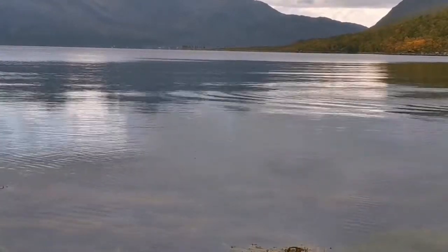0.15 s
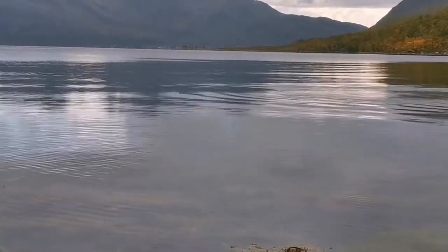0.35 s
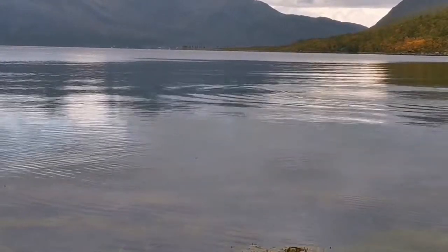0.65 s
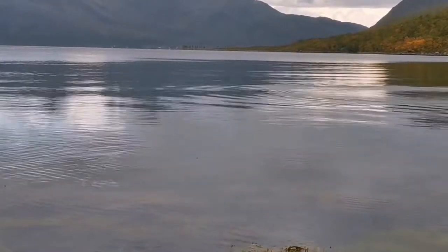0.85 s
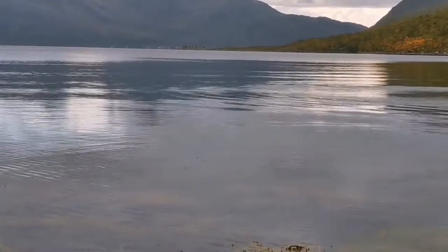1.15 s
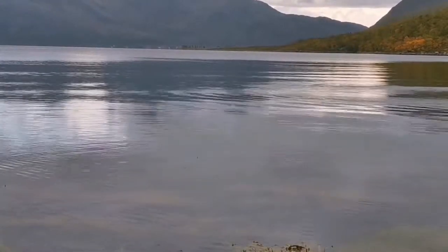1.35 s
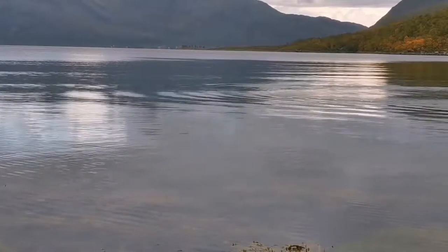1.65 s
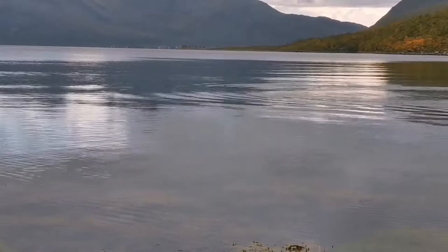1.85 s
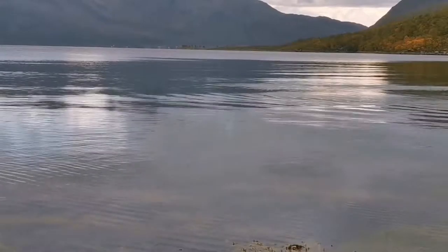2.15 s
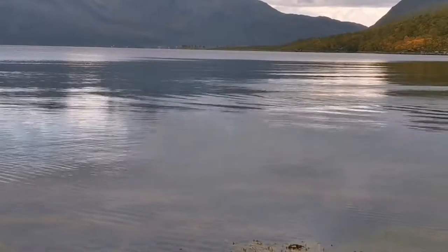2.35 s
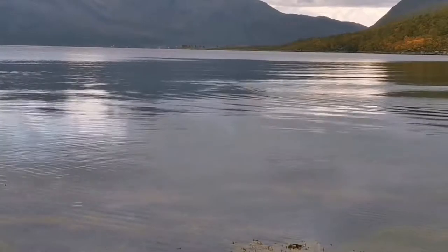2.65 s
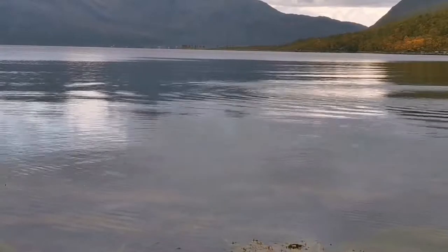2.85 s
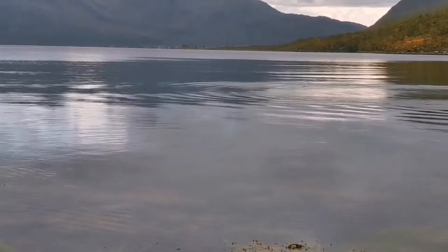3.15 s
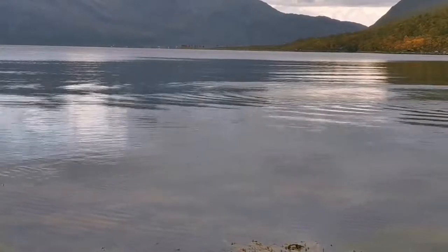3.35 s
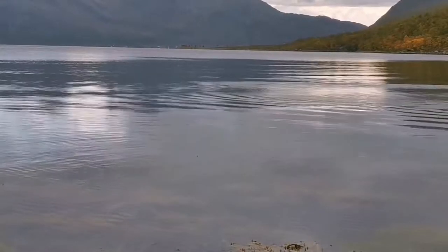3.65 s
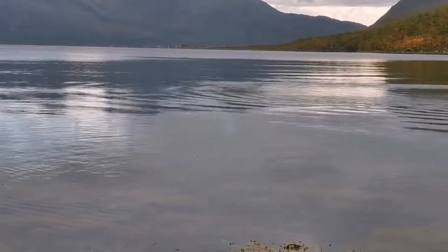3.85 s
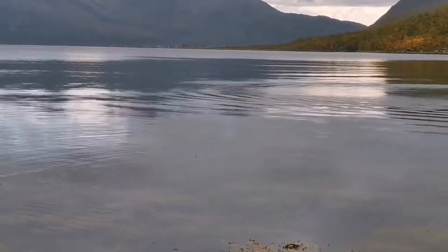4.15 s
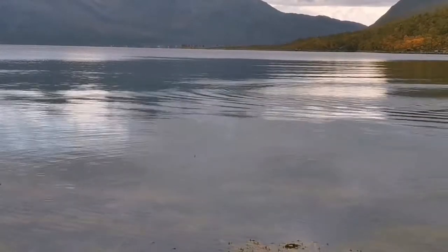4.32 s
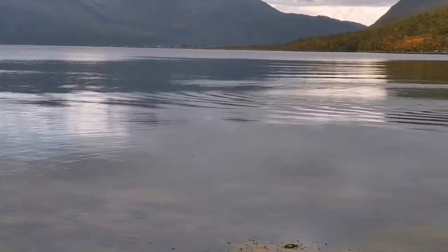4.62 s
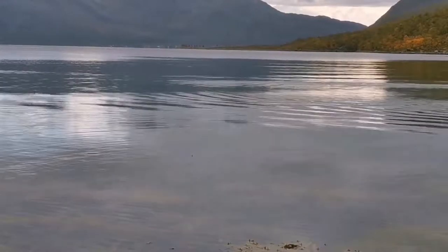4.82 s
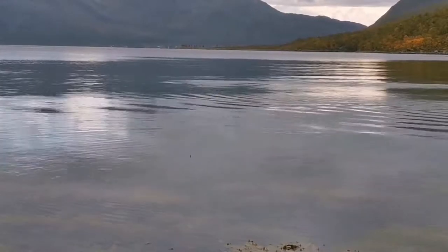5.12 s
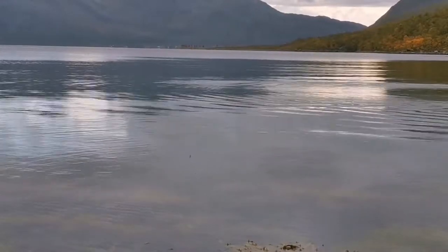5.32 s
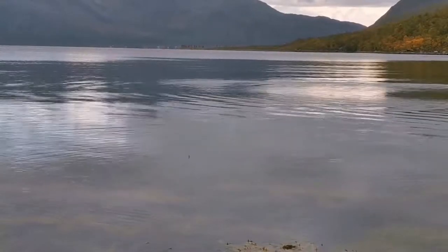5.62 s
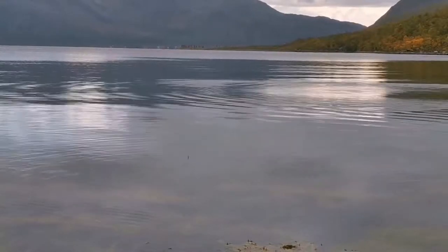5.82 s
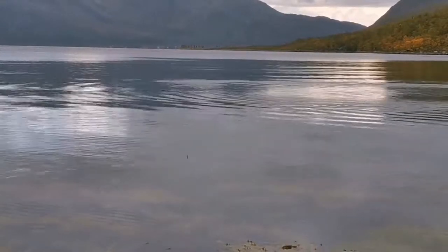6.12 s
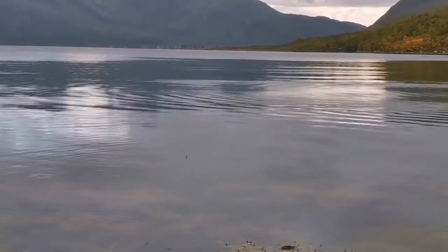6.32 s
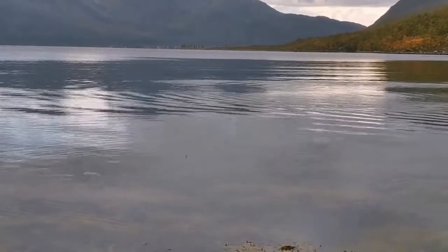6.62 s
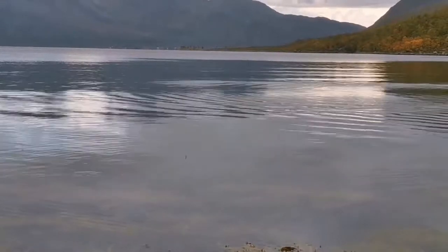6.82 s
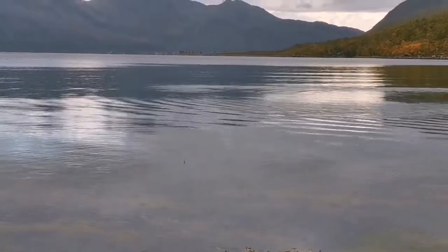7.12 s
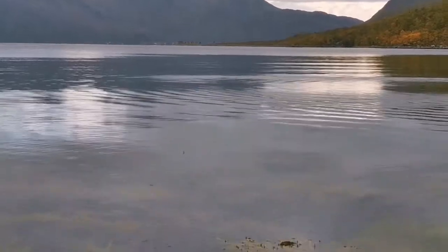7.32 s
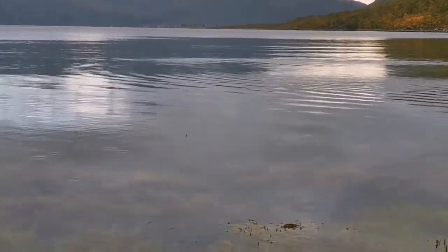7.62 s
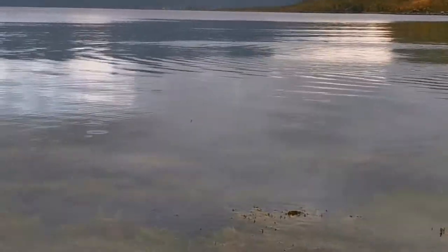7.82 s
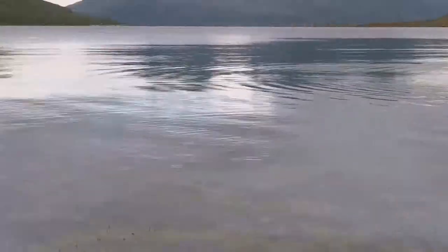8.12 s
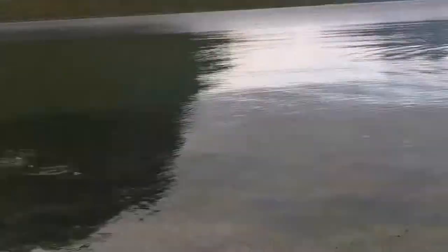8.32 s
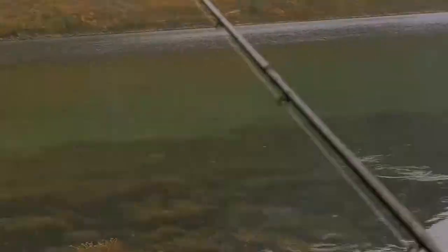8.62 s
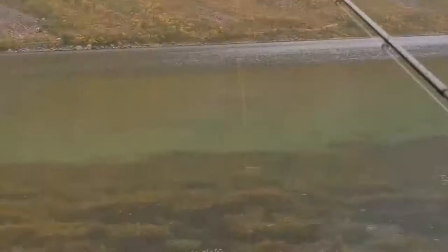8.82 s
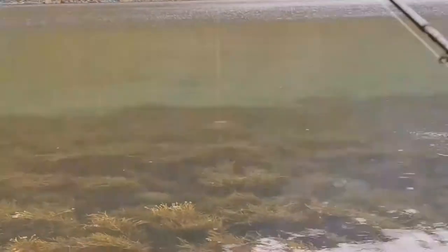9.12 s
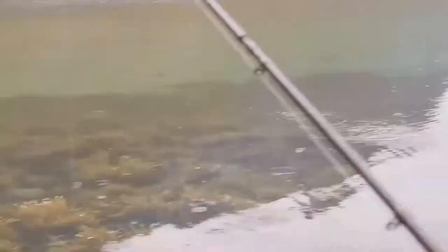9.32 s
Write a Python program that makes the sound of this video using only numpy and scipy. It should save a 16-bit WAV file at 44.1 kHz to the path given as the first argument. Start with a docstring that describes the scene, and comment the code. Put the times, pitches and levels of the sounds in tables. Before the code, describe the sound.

A calm shore, very quiet: low far-off water murmur, faint sleeve rustle near the right microphone, and tiny wet ticks, several around 1.3-2.2 s. To the right, an otter calls. Thin, piercing whistles around 5.5 kHz, each about a third of a second, start at 1.0, 2.4, 3.7 and a softer one at 4.9 s; each scoops up, turns slightly husky, then droops. Shorter, lower, reedy yelps near 1.5 kHz come at 1.35, 2.9 (strongest), 4.4, 5.4 and 6.5 s, with a weak, short echo. A brief cloth swish brushes by at 3.0 s. At 7.5 and 7.75 s there are small zip or clasp ticks on the right. From 8 s to the end at about 9.4 s, handling dominates: ragged cloth strokes and blunt finger knocks on the left, heaviest near 8.0-8.4 and 8.7 s, with lighter, hissier sliding on the right. A faint last whistle at 9.0 s is nearly masked.

```python
"""Otter calling on a calm rocky shore

Off to the right an otter gives long thin whistles (gliding tones that break into a husk) and low yelps
(harmonics on an arched pitch), with a weak echo. Behind it: far water and sleeve swishes, both coloured
noise, and small water ticks. Near the end the hand-held camera is handled: banded noise for cloth rubbing
its two microphone ports, damped sines with cracks for two zip or clasp ticks and then finger bumps."""
import sys
import numpy as np
from scipy import signal
from scipy.fft import rfft, irfft
from scipy.io import wavfile

SR = 44100
rng = np.random.default_rng(int(sys.argv[2]) if len(sys.argv) > 2 else 0)


def master_out(mix):
    """Clip the mix to full scale and print it as 16-bit PCM to the path in sys.argv[1]."""
    frames = np.transpose(np.atleast_2d(mix))
    ceiling = np.clip(frames, -1, 1)
    pcm = np.round(ceiling * 32767).astype(np.int16)
    wavfile.write(sys.argv[1], SR, pcm)


N = 417614
T = np.arange(N) / SR
HZ = np.maximum(np.arange(N // 2 + 1) * SR / N, 1)


def undb(db):
    """Decibels to gain."""
    return 10 ** (np.asarray(db) / 20)


def unit(x):
    """Scale to rms 1."""
    return x / np.sqrt(np.mean(x ** 2) + 1e-20)


def colour(points):
    """Gain at every frequency from (Hz, dB) points, straight over log frequency."""
    hz, db = np.transpose(points)
    return undb(np.interp(np.log(HZ), np.log(hz), db))


def filtered(x, gain):
    """Apply a gain per frequency."""
    return irfft(rfft(x) * gain, N)


def noise(gain):
    """Coloured noise of rms 1."""
    return unit(filtered(rng.standard_normal(N), gain))


def walk(rate_hz):
    """Smooth random signal of rms 1 that changes about rate_hz times a second."""
    return noise(1 / (1 + (HZ / rate_hz) ** 4))


def curves(rows):
    """The columns of a table, joined by straight lines in time."""
    s, *columns = np.transpose(rows)
    return [np.interp(T, s, c) for c in columns]


def gate(t, start, end, fade):
    """1 between start and end, with soft edges."""
    inside = np.minimum(t - start, end - t)
    return np.sin(np.pi / 2 * np.clip(inside / fade + .5, 0, 1)) ** 2


def edge(t, width):
    """A smooth step from 0 to 1 at t = 0."""
    return .5 + .5 * np.tanh(t / (2 * width))


def swell(start, length, attack, release):
    """Attack, hold and release of one movement."""
    return edge(T - start, attack) * edge(start + length - T, release)


def cycle(hz):
    """Phase of a vibration in radians."""
    return 2 * np.pi * np.cumsum(hz) / SR


def place(x, pan_db):
    """Share a sound between the ports, pan being left minus right; the louder one gets it in full."""
    return x * undb(np.minimum([[pan_db], [-pan_db]], 0))


# Far water common to both ports. Each row: frequency in Hz, relative density in dB per Hz.
SHORE_MID = [(15, -31), (25, -10.5), (49, -4.5), (86, -3), (156, 1.5), (349, -11.5), (762, -7), (1450, -16),
             (2300, -19), (2630, -25.5), (3830, -33.5), (6380, -39), (10600, -47), (12200, -46),
             (15500, -43)]
# Far water that differs between the ports. Each row: frequency in Hz, relative density in dB per Hz.
SHORE_SIDE = [(15, -35), (25, -16), (129, -12.5), (227, -11.5), (305, -16), (445, -15), (782, -11),
              (1240, -6.5), (1490, -9), (2360, -18), (3260, -25), (5580, -32.5), (15500, -41)]
# Tilt between the ports. Each row: frequency in Hz, left minus right in dB.
SHORE_BALANCE = [(60, 6), (200, 2), (400, 0.5), (700, -4), (2400, -6), (4400, 0.5), (15000, 3.5)]


def shore(mid_db=-54, side_db=-60.5, swell_db=.5, early_db=-2, grow_s=1.75):
    """Murmur of far water that grows a little at first; its bass reaches both ports nearly alike."""
    mid = undb(mid_db) * noise(colour(SHORE_MID)) * undb(swell_db * walk(2.9))
    side = undb(side_db) * noise(colour(SHORE_SIDE))
    lean = np.sqrt(colour(SHORE_BALANCE))
    growth = undb(early_db * np.exp(-T / grow_s))
    return growth * np.array([filtered(mid + side, lean), filtered(mid - side, 1 / lean)])


# Sleeve spectrum. Each row: frequency in Hz, relative density in dB per Hz.
SLEEVE_COLOUR = [(300, -9), (900, 4), (2300, 0), (3800, -4), (5800, -0.5), (7500, -5.5), (9500, 3),
                 (10700, 5.5), (12000, -2.5), (15500, -17)]
# Sleeve swishes. Each row: start in seconds, length in seconds, level in dB before grain and unevenness.
SWISHES = [(0.0, .15, -69.5), (0.594, 0.47, -68), (1.122, 0.07, -57), (1.99, 0.36, -70),
           (2.45, 0.19, -67.5), (3.002, 0.21, -41.5), (3.237, 0.053, -46), (3.35, .62, -65),
           (4.27, 0.082, -49), (4.363, .14, -59.5), (4.574, .42, -66), (5.028, 0.078, -52),
           (5.54, 0.3, -66), (5.776, 0.23, -63), (6.037, 0.41, -67), (6.58, 0.22, -68.5),
           (7.047, 0.69, -69)]


def sleeve(attack_s=0.027, release_s=0.028, rest_db=-75, grain_db=2.0, uneven_db=2.9, pan_db=-12):
    """Smooth cloth swishes close to the right port and never lies quite still."""
    power = undb(rest_db) ** 2
    for start, length, db in SWISHES:
        power = power + (undb(db) * swell(start, length, attack_s, release_s)) ** 2
    hiss = np.array([noise(colour(SLEEVE_COLOUR)) for _ in range(2)])
    texture = undb(grain_db * walk(160) + uneven_db * walk(8.5))
    return place(hiss * np.sqrt(power) * texture, pan_db)


# Water ticks among the stones. Each row: start in seconds, level in dB before gain and band-pass, pitch in Hz.
DRIPS = [(0.3526, -62, 2650), (1.3376, -52.5, 4500), (1.601, -58, 3700), (1.757, -46.5, 3100),
         (1.862, -53, 2530), (1.919, -57, 2590), (2.158, -55, 2720), (4.1064, -54, 2490),
         (4.9454, -49, 5530), (5.5213, -49, 5240)]


def drips(gain_db=2, t60_s=0.012, ring=1.0, pan_db=-6):
    """Tiny wet ticks: a splash of noise and a brief ring."""
    out, t = np.zeros(N), T[:SR // 20]
    for s, db, hz in DRIPS:
        start = int(s * SR)
        splash = rng.standard_normal(len(t)) + ring * np.sin(2 * np.pi * hz * t)
        out[start:start + len(t)] += undb(db + gain_db - 60 * t / t60_s) * splash
    band = signal.butter(1, [2500, 8000], "band", fs=SR, output="sos")
    return place(signal.sosfilt(band, out), pan_db)


# Edges of the rumble, body, scrape and hiss bands.
RUB_EDGES_HZ = [25, 400, 2500, 6000, 15800]


def rub(rumble, body, hiss, points, scrape_db, hiss_share, grain_db, catch_db):
    """Fibres catch and slip: pressure makes rumble, speed makes hiss; the scrape follows body and hiss."""
    tint, out = colour(points), 0
    slips = undb(catch_db * walk(45))
    scrape = undb(scrape_db) * body ** (1 - hiss_share) * hiss ** hiss_share
    for low, high, size in zip(RUB_EDGES_HZ, RUB_EDGES_HZ[1:], (rumble, body, scrape, hiss)):
        band = 1 / np.sqrt((1 + (low / HZ) ** 10) * (1 + (HZ / high) ** 10))
        fibres = rng.standard_normal(N) * slips * undb(grain_db * walk(810))
        out = out + size * unit(filtered(fibres, tint * band))
    return out


# Rubbing spectrum at the right port. Each row: frequency in Hz, relative density in dB per Hz.
RIGHT_COLOUR = [(25, 8), (150, -4), (400, -3.5), (650, 3), (1000, -5), (2500, 0.5), (3600, -2.5), (5400, 1),
                (6500, -5), (7700, -8), (9500, -2.5), (10700, 1), (13500, -7), (15500, -7.5)]
# Sliding on the right port. Each row: time in seconds, rumble, body and hiss levels in dB.
RIGHT_RUB = [(7.48, -51, -56, -68), (7.56, -52, -52.5, -43.5), (7.78, -45.5, -50, -48),
             (7.97, -60, -47, -44), (8.05, -50, -57, -58), (8.2, -42, -44, -49.5), (8.315, -40, -40, -43),
             (8.345, -45, -43, -38), (8.405, -52, -35.5, -54), (8.425, -45, -45, -50),
             (8.49, -58, -41, -40), (8.58, -51, -46, -39.5), (8.65, -45, -47.5, -51.5),
             (8.83, -46, -46.5, -42), (8.96, -54, -50, -41.5), (9.03, -53, -49, -38),
             (9.11, -53, -48, -42.5), (9.2, -48, -42, -35), (9.36, -51, -50, -44.5),
             (9.46, -52, -48, -44.5)]


def right_cloth():
    """Lighter, unbroken sliding over the right port."""
    contact = edge(T - RIGHT_RUB[0][0], .004)
    rumble, body, hiss = undb(curves(RIGHT_RUB)) * contact
    return rub(rumble, body, hiss, RIGHT_COLOUR, scrape_db=-4.5, hiss_share=0.1, grain_db=1.5, catch_db=1.0)


# Rubbing spectrum at the left port. Each row: frequency in Hz, relative density in dB per Hz.
LEFT_COLOUR = [(25, 4), (100, 3), (200, 1), (380, -1.5), (1000, -2), (2000, -4.5), (3000, -12.5),
               (3800, -15), (4900, -14.5), (6000, -25), (7000, -26.5), (8200, -34.5), (11500, -33),
               (15500, -35.5)]
# Strokes on the left port. Each row: start in seconds, length in seconds, initial body level in dB,
# fade over the stroke in dB (negative grows), rumble and hiss in dB against the body.
STROKES = [(7.55, 0.083, -60.5, 5, 15, 17.5), (7.63, 0.21, -55.5, 4, 6, 11), (7.85, 0.32, -52, 0, -4, 7.5),
           (7.962, 0.043, -42.5, -5.5, 3.5, 9.5), (7.992, 0.037, -24, 0, -2, -1),
           (8.018, 0.15, -21, 10.5, -1, -14.5), (8.173, 0.19, -27, 3, 0.5, -14.5),
           (8.275, .08, -36.5, -0.5, 3.5, -0.5), (8.352, 0.08, -32, 2.5, 0, -12.5),
           (8.448, 0.15, -28.5, 7.5, -2.5, 1.5), (8.601, 0.096, -36, -2, -3, -19),
           (8.7, 0.11, -37.5, 5, 6.5, -28), (8.793, 0.13, -30.5, -2, -5.5, -13),
           (8.931, .13, -34, 1.5, -3.5, -15.5), (9.074, 0.074, -31.5, 6.5, -5, -16),
           (9.138, 0.038, -31, -3.5, -1.5, -22), (9.19, 0.13, -52, -8.5, 4, -8),
           (9.31, 0.29, -54.5, -5, 9, -11)]


def left_cloth(attack_s=0.0055, release_s=0.01):
    """Stroke after stroke catches on the left port, fades or grows, and lets go."""
    power = np.zeros((3, N))
    for start, length, db, fade_db, rumble_db, hiss_db in STROKES:
        progress = np.clip((T - start) / length, 0, 1)
        size = swell(start, length, attack_s, release_s) * undb(db - fade_db * progress)
        power += (undb([[rumble_db], [0], [hiss_db]]) * size) ** 2
    rumble, body, hiss = np.sqrt(power)
    return rub(rumble, body, hiss, LEFT_COLOUR, scrape_db=2.5, hiss_share=0.46, grain_db=0.5, catch_db=1.14)


# Zip or clasp ticks (the first two rows) and finger bumps on the case. Each row: start in seconds,
# swing level in dB before onset and decay, pitch in Hz, ring t60 in seconds,
# initial crack rms as a share of the swing level, left minus right in dB.
CONTACTS = [(7.503, -38, 4480, 0.0058, 0.35, -13), (7.7522, -24, 5570, .004, 0.45, -16),
            (7.987, -22.5, 130, 0.041, .02, -21), (8.031, -5.5, 195, 0.012, 0.059, 30),
            (8.108, -3, 620, 0.0063, 0.15, 47), (8.309, -9, 183, 0.017, 0.046, 14),
            (8.349, -1.5, 363, 0.0078, .04, 22), (8.357, -16, 90, 0.023, .1, 12),
            (8.3618, -20.5, 1960, 0.0028, 1.8, 4), (8.4011, -18, 1110, 0.0098, 1.2, 12),
            (8.622, -17, 296, 0.028, .05, 22), (8.714, -7.5, 265, 0.017, .02, 25),
            (8.7206, -4, 252, 0.014, .02, 25), (8.7255, 2, 289, 0.0085, 0.019, 16),
            (8.7304, -11.5, 234, 0.043, .04, 14), (8.809, -18, 220, 0.041, .05, 24),
            (8.834, -12, 205, 0.024, .05, 21), (8.851, -14, 200, 0.019, 0.055, 22),
            (8.945, -3.5, 785, 0.0051, 0.078, 28), (9.184, -20, 71, 0.033, .02, 27),
            (9.282, -24.5, 62.7, 0.082, .05, 20), (9.3701, -11.5, 700, 0.012, 0.055, 21),
            (9.4557, -8.5, 690, 0.0056, 0.071, 23)]


def contacts(contact_s=0.0001, crack_s=0.0017, crack_hz=4200):
    """Each contact gives a few damped swings and a crack; high contacts crack brighter."""
    out, t = np.zeros((2, N + SR)), T[:SR // 10]
    for s, db, hz, t60_s, crack_share, pan_db in CONTACTS:
        lowpass = signal.butter(4, max(crack_hz, 2 * hz), fs=SR, output="sos")
        tick = unit(signal.sosfilt(lowpass, rng.standard_normal(len(t))))
        crack = crack_share * tick * np.exp(-t / crack_s)
        swing = np.sin(2 * np.pi * hz * t) * undb(-60 * t / t60_s) * (1 - np.exp(-t / contact_s))
        start = int(s * SR)
        out[:, start:start + len(t)] += place(undb(db) * (swing + crack), pan_db)
    return out[:, :N]


# Yelps. Each row: start in seconds, length in seconds, pitch top, clear from and clear until in seconds
# after the start, top pitch in Hz, rise and fall in Hz (over arch_s), pitch jump at the rough end as a share,
# fundamental in dB at the top, harmonics 2, 3, 4 and half harmonics in dB against it before dulling,
# left minus right of the fundamental in dB.
YELPS = [(1.35, .17, 0.087, 0.0051, .15, 1525, 85, 116, .01, -49.5, -15, -6.5, -20, -10.5, 5),
         (2.92, .192, 0.087, 0.033, 0.15, 1579, 110.2, 125, .01, -34, -8.5, -9, -10.5, -28, -6.5),
         (4.378, 0.19, .1, 0.057, 0.17, 1437, 110.7, 160, 0.16, -45.5, 1.5, -31, -24, -38, -8),
         (5.385, .195, .088, 0.024, .105, 1453, 35.4, 80, 0.0104, -50, -15, -6, -16, -33, -0.5),
         (6.51, 0.22, .1, 0.117, 0.186, 1494, 69.8, 125, 0.011, -48, -15, -9.5, -12, -13, -1)]


def yelps(arch_s=.08, ebb_db=5, push_db=3, upper_db=-33, onset_db=-7, dull_db=-3, tired_db=-5, waver_db=2.5,
          jitter=0.006, rough_jitter=0.0255, shimmer_db=2.5, growl_db=-12, high_pan_db=-12):
    """A low, reedy register: clear in the middle, rough where the voice starts and breaks off."""
    out, flutter, tremor, waver = np.zeros((2, N)), walk(330), walk(270), walk(35)
    for (start, length, top_s, clear_from, clear_until, top_hz, rise_hz, fall_hz, jump, db,
         *harmonics_db, halves_db, pan_db) in YELPS:
        i = np.flatnonzero((T > start - .02) & (T < start + length + .02))
        t = T[i] - start
        # effort arches: pitch and level sink away from the top
        slack = ((t - top_s) / arch_s) ** 2
        rough = 1 - gate(t, clear_from, clear_until, 0.017)
        tired = edge(t - clear_until, 0.0042)

        arch_hz = top_hz - np.where(t < top_s, rise_hz, fall_hz) * slack
        hz = arch_hz * (1 + jump * tired)
        level_db = db - ebb_db * slack + onset_db * rough * (t < top_s) + push_db * tired
        size = gate(t, 0, length, 0.0044) * undb(level_db)
        phase = cycle(hz * (1 + (jitter + rough_jitter * rough) * flutter[i]))

        overtones = sum(undb(h) * np.sin(k * phase) for k, h in enumerate(harmonics_db, 2))
        upper = undb(upper_db) * sum(np.sin(k * phase) for k in range(5, 8))
        # alternating strong and weak cycles add lines between the harmonics
        halves = np.sin(5 * phase / 2) + np.sin(7 * phase / 2) / 3 + np.sin(9 * phase / 2) / 3
        growl = undb(growl_db) * rough * sum(np.sin((k + .5) * phase) / k for k in range(1, 5))

        # a slack or tired voice is duller
        brightness = undb(dull_db * slack + tired_db * tired + waver_db * waver[i])
        high = (overtones + upper + undb(halves_db) * halves) * brightness + growl
        # the camera body shades the left port from the overtones
        voice = place(np.sin(phase), pan_db) + place(high, high_pan_db)
        out[:, i] += size * voice * undb(shimmer_db * rough * tremor[i])
    return out


LEAD_IN_S = .04


def lead_in(t, from_hz=4200, to_hz=4430, swell_db=23):
    """A thin lower squeak that rises and swells until the whistle takes over at t = 0."""
    u = np.clip(1 + t / LEAD_IN_S, 0, 1)
    hz = from_hz + (to_hz - from_hz) * u
    return np.sin(cycle(hz)) * undb(-swell_db * (1 - u) ** 2) * gate(t, -LEAD_IN_S, 0.0039, .006)


# Whistles. Each row: start in seconds, length in seconds, break in seconds after the start, clear, top and
# end pitch in Hz, power of the sag, level in dB before scoop and fades, drop at the break in dB, lead-in peak
# in dB, trim of the clear overtones in dB, husk in dB before trim, husk pitch as a share of the whistle's.
WHISTLES = [(0.97, 0.31, 0.062, 5580, 5770, 5070, 3.4, -34.5, 3, -60, -15, -23.5, 0.71),
            (2.431, 0.37, 0.14, 5486, 5710, 5060, 2.25, -34.5, 8.5, -62, -1.5, -17, 0.72),
            (3.675, .4, 0.12, 5520, 5641, 4950, 2, -34, 9, -61, -8, -12.5, 0.71),
            (4.887, 0.367, 0.107, 5610, 5690, 4950, 2.2, -41.5, 3.5, -42, 2, -15, .75),
            (8.97, 0.33, .07, 5500, 5600, 4950, 0.96, -50.5, -2, -72, -12, -20, .7)]


def whistles(scoop_hz=189, scoop_s=0.0157, scoop_db=11, step_s=0.01, fade_db=11, fade_power=9.0,
             half_db=-28, third_db=-30, octave_db=-28, jitter=0.00048, husk_jitter=0.0028, wander=0.0296,
             husk_s=0.22, husk_trim_db=-1.5, sputter_db=3.7, shimmer_db=1.0, waver_db=-1.64, pan_db=-22):
    """A nearly pure tone with half harmonics; after the break it flutters and lower tones rasp beneath it."""
    out, flutter, tremor = np.zeros(N), walk(130), walk(45)
    chaos, sputter, waver = walk(490), walk(90), walk(4.7)
    for (start, length, break_s, clear_hz, top_hz, end_hz, power, db, drop_db,
         lead_db, overtones_db, husk_db, husk_share) in WHISTLES:
        i = np.flatnonzero((T > start - 2 * LEAD_IN_S) & (T < start + length + LEAD_IN_S))
        t = T[i] - start
        since = t - break_s
        # scoop up to pitch, step up at the break, then sag and fade as the effort runs out
        scoop = np.exp(-np.maximum(t, 0) / scoop_s)
        husky = edge(since, step_s)
        spent = np.clip(since / (length - break_s), 0, 1)
        hz = clear_hz - scoop_hz * scoop + (top_hz - clear_hz) * husky - (top_hz - end_hz) * spent ** power
        loss_db = scoop_db * scoop ** 2 + drop_db * husky + fade_db * spent ** fade_power
        size = gate(t, 0, length, .005) * undb(db - loss_db + waver_db * waver[i])

        phase = cycle(hz * (1 + (jitter + husk_jitter * husky) * flutter[i]))
        tone = np.sin(phase) * undb(shimmer_db * tremor[i])
        overtones = undb(half_db) * np.sin(phase / 2) + undb(third_db) * np.sin(3 * phase / 2)
        overtones += undb(octave_db) * np.sin(2 * phase)
        clear = (1 - husky) * undb(overtones_db) * overtones

        # two loosely held tones under the whistle, dying away as the effort falls
        loose = cycle(hz * (1 + wander * chaos[i]))
        husk = np.sin(husk_share * loose) + .6 * np.sin(.512 * loose)
        husk *= husky * np.exp(-(since / husk_s) ** 2)
        husk *= undb(husk_db + husk_trim_db + sputter_db * sputter[i])
        out[i] += size * (tone + clear + husk) + undb(lead_db) * lead_in(t)
    return place(out, pan_db)


def spaced(x, port_lag_s=.00041):
    """The ports lie a hand's length apart, so the calls reach the right one a moment later."""
    return np.array([x[0], np.roll(x[1], round(port_lag_s * SR))])


def rocks(x, wet_db=-27, t60_s=0.45):
    """The shore scatters a weak, short echo: decaying noise tails, one per port."""
    t = T[:SR // 2]
    decay = undb(-60 * t / t60_s)
    tails = [unit(rng.standard_normal(len(t)) * decay) / np.sqrt(len(t)) for _ in range(2)]
    echo = np.array([signal.fftconvolve(x[1], tail)[:N] for tail in tails])
    return x + undb(wet_db) * echo


def scene():
    """The otter and the shore, with the handling of the camera."""
    background = shore() + sleeve()
    handling = np.array([left_cloth(), right_cloth()]) + contacts()
    otter = spaced(whistles() + yelps())
    return background + handling + rocks(otter + drips())


def record(dry):
    """The camera cuts the top with a steep low-pass."""
    lowpass = signal.ellip(10, .1, 80, 15800, fs=SR, output="sos")  # order, ripple dB, stopband dB, Hz
    return signal.sosfilt(lowpass, dry)


dry = scene()
out = record(dry)
master_out(out)
```